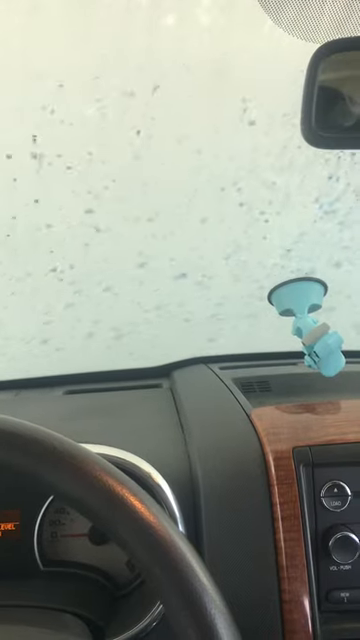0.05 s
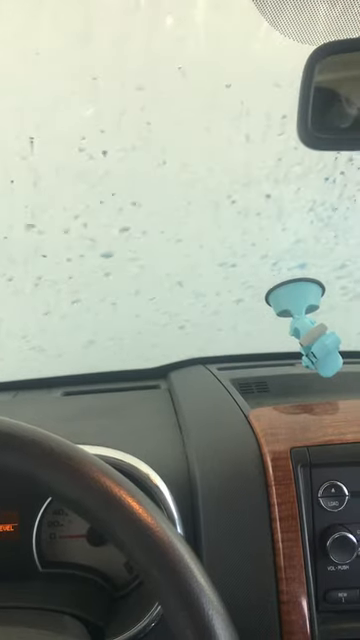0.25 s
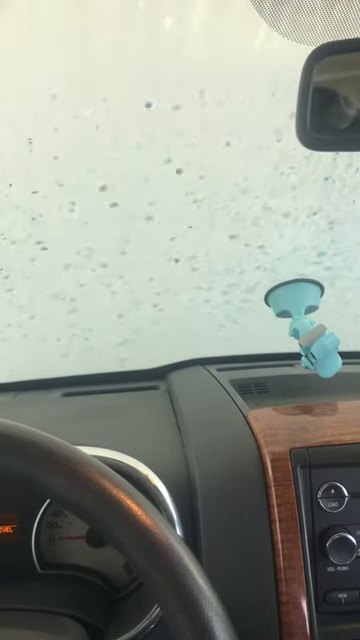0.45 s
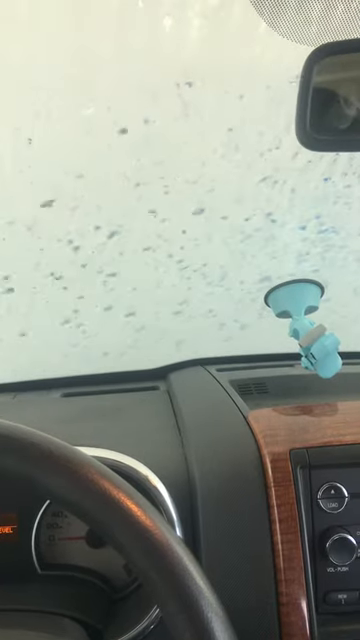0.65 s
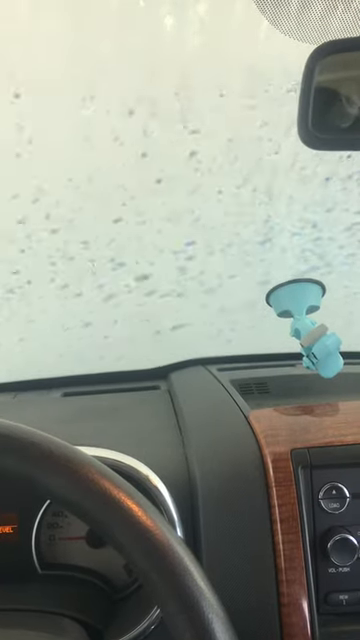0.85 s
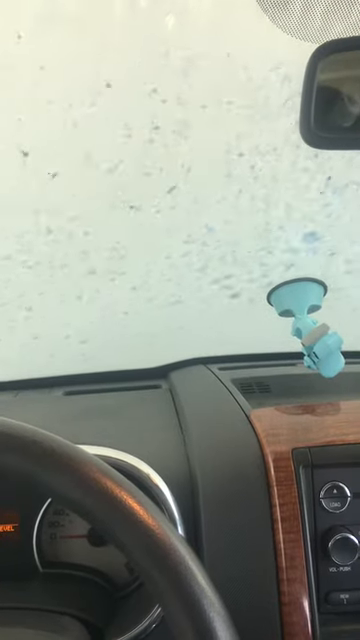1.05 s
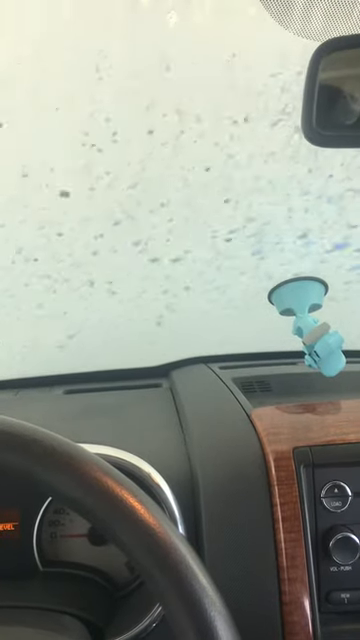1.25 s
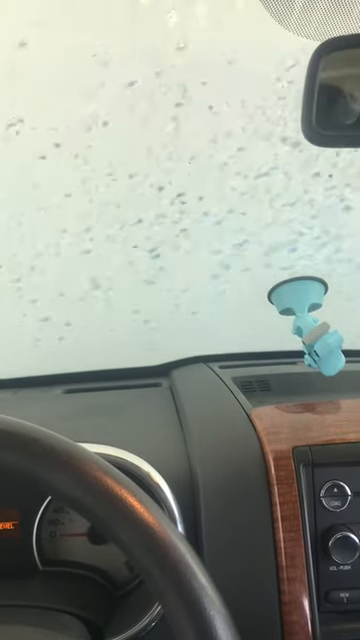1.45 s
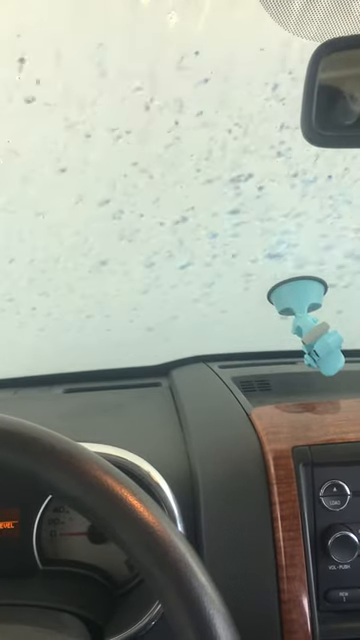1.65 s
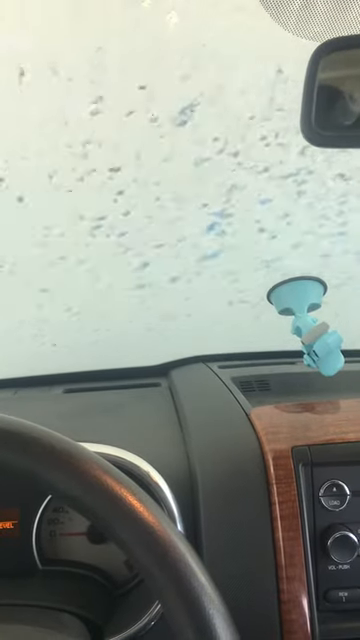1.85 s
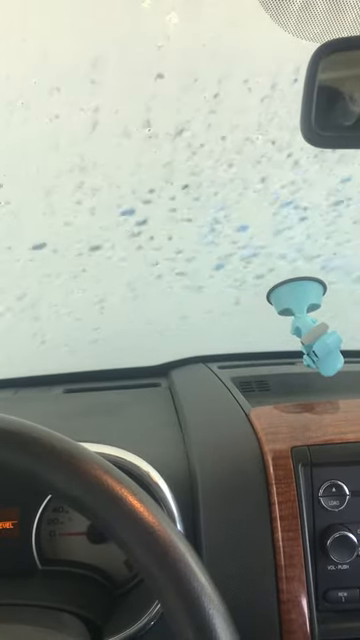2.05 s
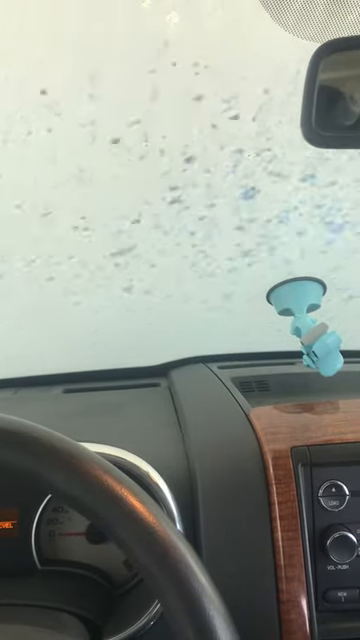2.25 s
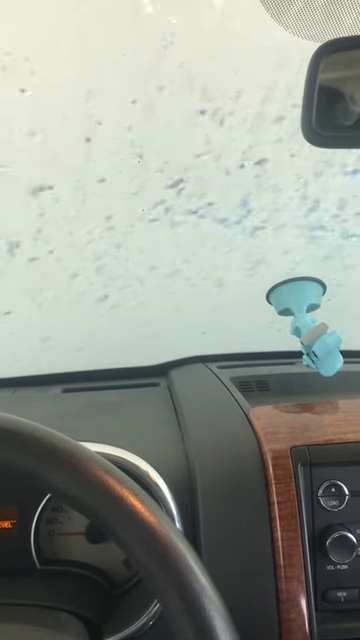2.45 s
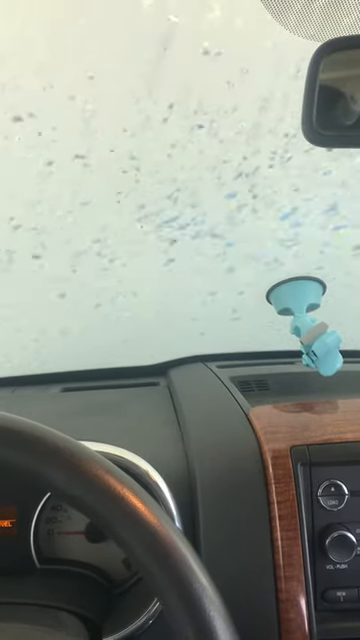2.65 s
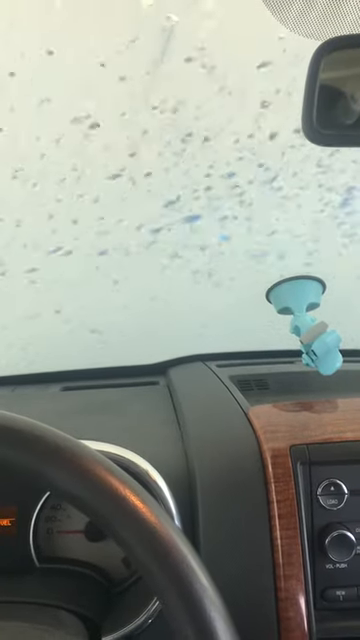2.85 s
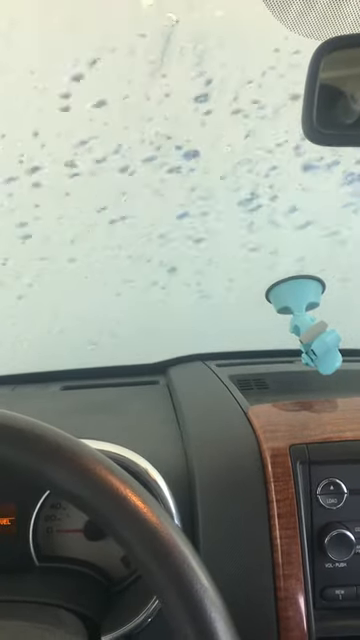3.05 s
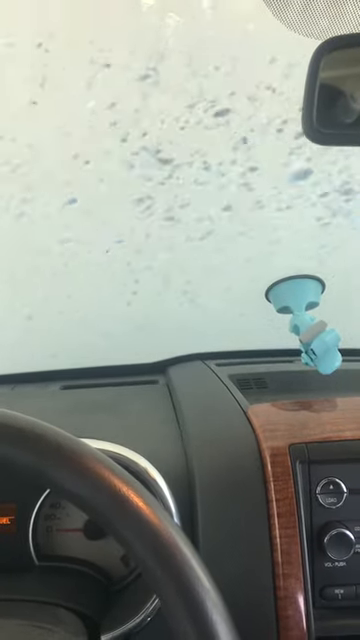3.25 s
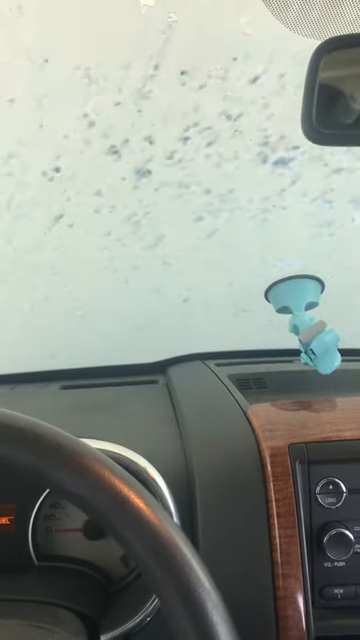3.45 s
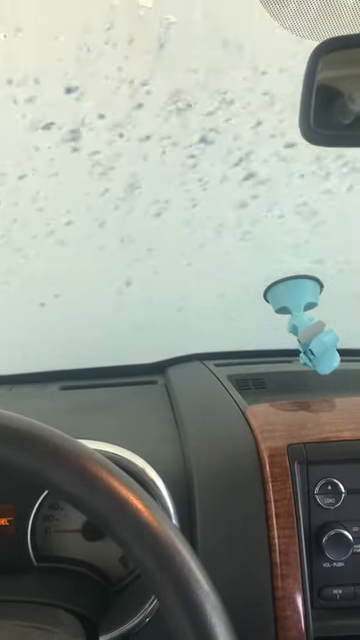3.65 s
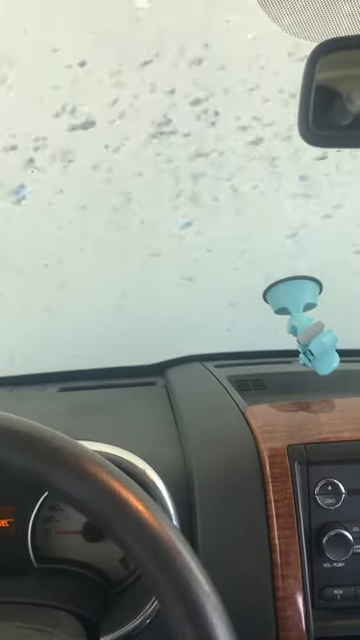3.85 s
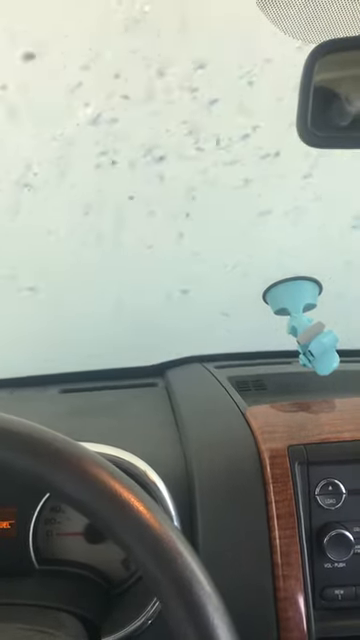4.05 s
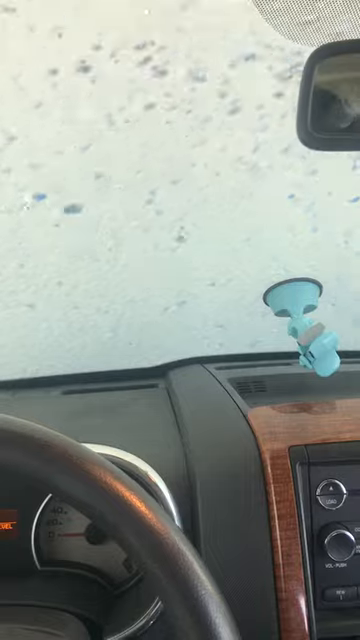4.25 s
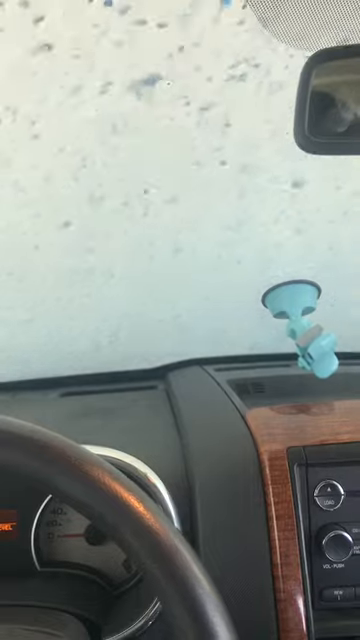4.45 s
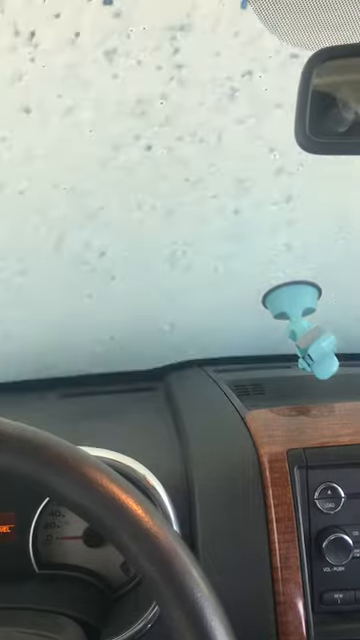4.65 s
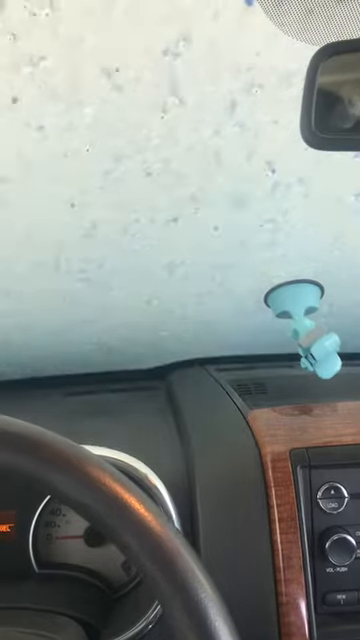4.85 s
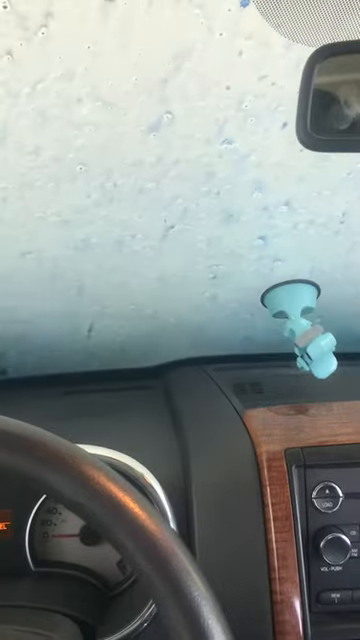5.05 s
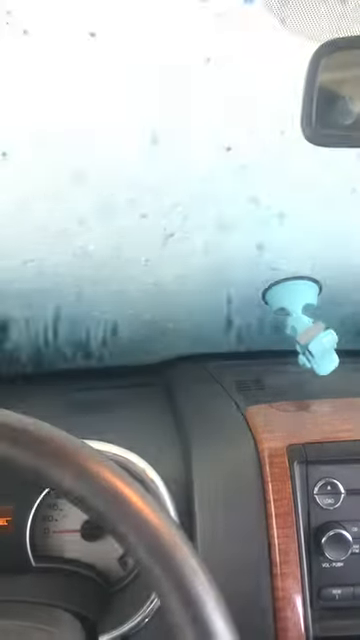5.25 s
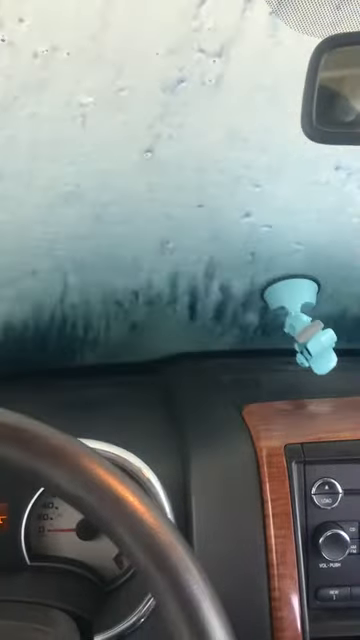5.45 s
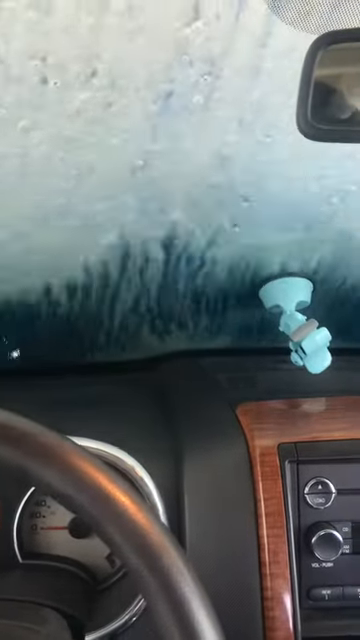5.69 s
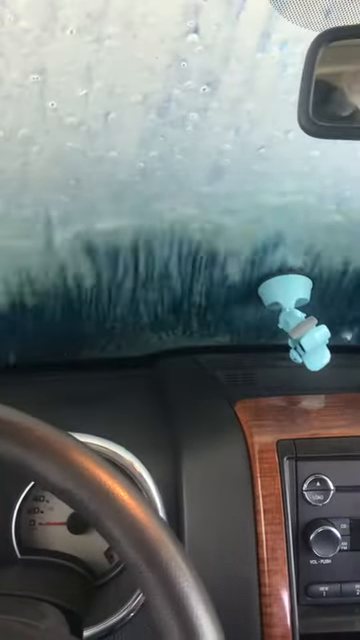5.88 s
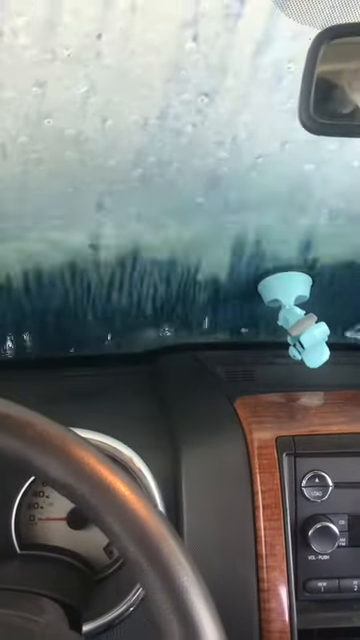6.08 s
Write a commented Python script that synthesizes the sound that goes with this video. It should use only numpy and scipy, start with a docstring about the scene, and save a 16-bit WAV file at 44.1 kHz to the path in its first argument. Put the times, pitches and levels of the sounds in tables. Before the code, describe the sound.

Muffled roller drumming and steady water hiss surround a car's cabin, then wet cloth strips crackle across the glass, growing loud and close.

```python
"""Wet cloth strips on a spinning roller slap the windscreen close in front of a phone at the driver's seat
of a closed car in an automatic wash: short pitched ticks with a wet smear and a spit of treble.
Before that the roller beats along the bonnet: resonant noise drums as booms and panel roar, panels knock,
and each bunch of strips swells as coloured spatter over a steady far wash of water.
As it climbs onto the glass, a bright, grainy scrubbing hiss sets in and swells."""
import sys
import numpy as np
from scipy import signal
from scipy.fft import rfft, irfft
from scipy.io import wavfile
from scipy.ndimage import uniform_filter1d

SR = 44100
rng = np.random.default_rng(int(sys.argv[2]) if len(sys.argv) > 2 else 0)


def voltage_ratio(level):
    """Linear amplitude factor for a level in decibels (scalar or array-like)."""
    return 10 ** (np.asarray(level, float) / 20)


def file_out(sig):
    """Save sig as 16-bit WAV at sys.argv[1]."""
    # one column per channel
    cols = np.atleast_2d(sig).T
    # limit, then scale
    lim = np.clip(cols, -1, 1)
    pcm = np.round(lim * 32767).astype(np.int16)
    wavfile.write(sys.argv[1], SR, pcm)


N = 269892
TIME = np.arange(N) / SR

# Drumming of the body, uneven, louder towards the end.
# Each row: time in seconds, cabin boom level in dB, panel roar level in dB.
DRUM = [(0.0, -30.5, -37.5), (1.3, -29, -38), (2.4, -30.5, -37.5), (3.7, -29.5, -37), (4.05, -27, -37.5),
        (4.2, -32, -36), (4.7, -28, -38), (5.3, -26.5, -32.5), (5.55, -24.5, -30.5), (5.63, -30, -29.5),
        (5.78, -20.5, -31), (5.87, -27, -29.5), (5.94, -20, -28.5), (6.12, -23.5, -29)]
# Air resonances of the closed cabin. Each row: centre in Hz, width in Hz, relative level in dB.
CABIN_MODES = [(30.2, 3.9, -1), (49.2, 11.4, -1.5), (67.3, 9.8, -8), (103.2, 14, -0.5), (130.6, 15.5, -2.5),
               (144.8, 19.6, -1.5), (166.3, 34.4, -8)]
# Resonances of the body panels. Each row: centre in Hz, width in Hz, relative level in dB.
PANEL_MODES = [(203, 35, -4), (246, 70, -1), (318.3, 58.5, 0), (409.5, 100, -4.5), (664, 407, -15.5),
               (836.6, 70, -10), (1008, 99, -11.5), (1205, 112, -14.5)]
# Bunches of wet strips wiping the paint, most of them heavy.
# Each row: time of the crest in seconds, its level in dB before overlap and filtering.
BUNCHES = [(0.055, -51.5), (0.156, -53), (0.31, -57), (0.44, -52.5), (0.549, -49), (0.667, -49.5),
           (0.763, -49), (0.887, -51.5), (0.965, -67), (1.135, -51), (1.22, -61), (1.363, -51),
           (1.476, -52), (1.6, -51.5), (1.72, -62), (1.84, -53), (1.975, -47.5), (2.14, -55), (2.366, -53),
           (2.444, -51), (2.611, -50), (2.73, -51), (2.82, -53), (2.968, -53), (3.097, -54), (3.215, -51),
           (3.316, -55), (3.438, -46.5), (3.536, -49.5), (3.643, -47), (3.835, -50.5), (3.929, -48.5),
           (4.139, -47), (4.196, -49.5), (4.3, -49.5), (4.477, -53), (4.671, -52), (4.759, -47)]
# Spectrum of the swish on the far bonnet. Each row: frequency in Hz, relative density in dB per Hz.
PAINT = [(760, -45.5), (1300, -6), (1540, -7.5), (2720, -7.5), (4920, -14.5), (6180, -18.5), (7770, -23.5),
         (8540, -23), (10300, -22), (12900, -25.5), (15600, -27)]
# Spectrum of the scrubbing on the near windscreen. Each row: frequency in Hz, relative density in dB per Hz.
GLASS = [(760, -32), (1300, 2), (1540, -1), (2430, 3), (3870, -3), (4250, 1.5), (4870, -7.5), (6120, -7.5),
         (7150, -17), (9670, -18), (10400, -19), (11300, -20), (13600, -21), (15600, -24)]
# The roller scrubbing the glass.
# Each row: time in seconds, level in dB of each drop size before its band is filtered out.
SCRUB = [(4.83, -59), (4.864, -48), (4.875, -46), (4.93, -48.5), (5.0, -46.5), (5.09, -50.5), (5.19, -42.5),
         (5.225, -46.5), (5.3, -37), (5.345, -41.5), (5.41, -38), (5.48, -39.5), (5.6, -38), (5.66, -35.5),
         (5.705, -42.5), (5.74, -36.5), (5.84, -35.5), (5.895, -35.5), (5.93, -31.5), (5.97, -35),
         (6.0, -31), (6.043, -34), (6.072, -31.5), (6.12, -33)]
# Strips slapping the glass, hard and soft.
# Each row: start in seconds, tick envelope peak in dB, pitch in Hz, treble in dB before SPIT_DB and filtering.
SLAPS = [(4.8677, -28, 2960, -38), (4.9024, -31, 2550, -52), (4.9432, -30, 3000, -58),
         (4.9608, -31, 3390, -47), (4.9843, -42, 3040, -52), (5.0337, -34, 3670, -55),
         (5.0538, -32, 3520, -45), (5.0736, -36, 2790, -54), (5.1565, -43, 3410, -50),
         (5.1699, -41, 2780, -51), (5.1946, -33, 4150, -52), (5.1997, -32, 3530, -53),
         (5.2102, -29, 2360, -52), (5.2306, -25, 2980, -50), (5.2408, -21.5, 2820, -43),
         (5.2489, -31, 3900, -37), (5.2586, -19.5, 3300, -36), (5.2835, -41, 3580, -49),
         (5.3016, -21.5, 3450, -38), (5.354, -32, 3800, -46), (5.3657, -33, 2950, -40),
         (5.3856, -20, 3110, -34), (5.3978, -17.5, 3500, -42), (5.4014, -18, 3400, -39),
         (5.4241, -24, 2550, -46), (5.4434, -33, 3030, -49), (5.4616, -26, 3770, -44),
         (5.486, -37, 4030, -50), (5.5091, -24, 3300, -49), (5.5406, -28, 2720, -49),
         (5.5505, -24, 4090, -43), (5.5795, -22, 3100, -43), (5.5894, -19, 2700, -49),
         (5.6057, -26, 4000, -48), (5.6369, -27, 3800, -44), (5.6498, -24, 2800, -42),
         (5.6584, -23, 3290, -28), (5.6785, -24, 4020, -39), (5.7265, -17.5, 3670, -47),
         (5.7475, -21.5, 2880, -36), (5.7658, -28, 3410, -42), (5.7773, -24, 4500, -41),
         (5.7969, -32, 3270, -48), (5.8045, -23, 3720, -40), (5.8197, -19, 3200, -38),
         (5.8535, -19, 4380, -38), (5.87, -16, 3800, -32), (5.8714, -20, 3780, -39),
         (5.9097, -25, 3750, -42), (5.9154, -19, 3280, -38), (5.9276, -21, 3050, -36),
         (5.934, -16, 3930, -34), (5.9775, -14.5, 2870, -37), (5.9795, -27, 2950, -41),
         (5.9828, -28, 2430, -44), (5.9887, -20, 2550, -37), (5.9917, -24, 2870, -41),
         (6.007, -13.5, 3750, -32), (6.014, -22, 3810, -32), (6.0262, -17, 3070, -43),
         (6.0486, -26, 3800, -28), (6.0565, -20, 3300, -29), (6.0939, -30, 3100, -26),
         (6.1018, -31, 3060, -30), (6.1113, -29, 3100, -27)]
# Knocks on a panel.
# Each row: start in seconds, drive in dB before the knock's gains, row of PANEL_MODES that rings (from 0).
KNOCKS = [(2.598, -33, 6), (2.855, -31, 6), (3.1, -35, 6), (3.424, -36, 4), (3.43, -31.5, 6),
          (3.4355, -33.5, 7), (3.444, -38, 5), (3.634, -34, 5), (4.221, -30, 7)]
# Dips from reflections near the phone. Each row: centre in Hz, width in Hz, depth from 0 to 1.
DIPS = [(4920, 200, 0.45), (7500, 660, 0.17), (10380, 1630, 0.52)]

GLASS_START_S = SCRUB[0][0]  # the roller leaves the bonnet for the windscreen
WASH_DB = -49.5  # level in dB of the steady far wash
BUNCH_SPREAD_S = 0.019  # standard deviation of each swell
LIGHT_WIPES_PER_S, LIGHT_WIPE_DB, LIGHT_WIPE_SCATTER_DB = 8, -62, 2
KNOCK_RING_DB, KNOCK_SCUFF_DB = 2.5, 0
BOOM_DRIFT, PANEL_DRIFT = 0.04, 0.012  # rms share by which the loaded body's resonances wander
FLICKS_PER_S, FLICK_DB, FLICK_TREBLE_DB, FLICK_SCATTER_DB = 400, 2, -14, 2.5  # dB over the scrub level
FLICK_HZ, FLICK_OCTAVES = 3100, 0.32  # median pitch of the random strips and its spread
TICK_CYCLES = 1.1
SPLASH_DB, SPLASH_S = -12.5, 0.0025  # wet smear, over the strip's tick
SPIT_DB, SPIT_S, SPIT_RISE_S = 4, 0.0012, 0.0002  # burst of treble, over the strip's treble setting
SPIT_TAIL, SPIT_TAIL_S = 0.1, 0.012  # share and decay time of the after-sizzle


def curve(table):
    """Each column of a table as a signal, joined by straight lines."""
    s, *columns = np.transpose(table)
    return [np.interp(TIME, s, column) for column in columns]


def unit(x):
    """Scale to rms 1."""
    return x / np.sqrt(np.mean(x ** 2))


def above(x, hz):
    """Steep high-pass."""
    return signal.sosfilt(signal.butter(4, hz, "high", fs=SR, output="sos"), x)


def below(x, hz):
    """Steep low-pass."""
    return signal.sosfilt(signal.butter(4, hz, fs=SR, output="sos"), x)


def ring(x, hz, width):
    """Two-pole resonance, gain 1 at the centre."""
    return signal.lfilter(*signal.iirpeak(hz, hz / width, fs=SR), x)


def colour(x, table):
    """Causal, unit-energy filter with the shape of a spectrum, built from the folded cepstrum."""
    hz, db = np.transpose(table)
    log_hz = np.log(np.fft.rfftfreq(1024, 1 / SR) + 1)
    gain_db = np.interp(log_hz, np.log(hz), db)
    cepstrum = irfft(gain_db * np.log(10) / 20)
    cepstrum[1:512] *= 2
    cepstrum[513:] = 0
    taps = irfft(np.exp(rfft(cepstrum)))
    return signal.fftconvolve(x, taps / np.sqrt(np.sum(taps ** 2)))[:N]


def walk(rate):
    """Random levels held 1 / rate seconds, smoothed twice and scaled to rms 1."""
    hold = int(SR / rate)
    steps = np.repeat(rng.standard_normal(N // hold + 1), hold)
    smooth = uniform_filter1d(uniform_filter1d(steps, hold), hold)
    return unit(smooth[:N])


def fade(x, t60):
    """Every impulse leaves an exponential tail."""
    return signal.lfilter([1], [1, -np.exp(-np.log(1000) / (t60 * SR))], x)


def spatter(per_s, spread_db, t60):
    """Dense droplets and strip ends: random clicks of unequal size, each with a short noisy tail."""
    hit = rng.random(N) < per_s / SR
    size = hit * voltage_ratio(spread_db * np.minimum(rng.exponential(size=N), 3))
    # overlapping tails add in power
    power = fade(size ** 2, t60 / 2)
    return unit(np.sqrt(power) * rng.standard_normal(N))


def resonate(modes, flicker_db, drift):
    """Unrelated noise in each resonance, whose level flickers and whose centre wanders a little."""
    out = 0
    for hz, width, db in modes:
        # a second, wider pass darkens the valleys
        tone = ring(ring(rng.standard_normal(N + SR), hz, width), hz, 2.36 * width)
        # reading the noise at an uneven pace bends its pitch
        place = SR / 2 + np.cumsum(1 + drift * walk(2.5))
        bent = np.interp(place, np.arange(N + SR), tone)
        out = out + voltage_ratio(db + flicker_db * walk(6)) * bent
    return unit(out)


def cabin(x, wet_db, t60):
    """Sparse early reflections from glass, roof and seats of the small, padded cabin."""
    t = TIME[:2000]
    echoes = (rng.random(len(t)) < 0.04) * rng.standard_normal(len(t))
    echoes = echoes * np.exp(-np.log(1000) * t / t60)
    return x + voltage_ratio(wet_db) * signal.fftconvolve(x, echoes / np.sqrt(np.sum(echoes ** 2)))[:N]


def wash():
    """Steady water on the far bonnet: droplets whose tails merge into a hiss."""
    return voltage_ratio(WASH_DB) * colour(spatter(900, 1.34, 0.11), PAINT)


def bunches():
    """Amplitude of the wiping: one smooth swell shape for each bunch landing until the roller is on the glass."""
    # light wipes fall at random
    lands = (rng.random(N) < LIGHT_WIPES_PER_S / SR) * (TIME < GLASS_START_S)
    lands = lands * voltage_ratio(LIGHT_WIPE_DB + LIGHT_WIPE_SCATTER_DB * rng.standard_normal(N))
    s, db = np.transpose(BUNCHES)
    lands[(s * SR).astype(int)] = voltage_ratio(db)
    swell = signal.windows.gaussian(SR // 4, BUNCH_SPREAD_S * SR)
    return np.maximum(signal.fftconvolve(lands, swell, "same"), 0)


def wipes(wiping):
    """Each bunch of strips swishes over the paint: spatter that swells and dies away."""
    swish = wiping * colour(spatter(700, 1.5, 0.044), PAINT)
    # a little duller than the wash
    return below(swish, 8900) + voltage_ratio(-3.0) * above(swish, 12000)


def knocks():
    """A bunch of strips scuffs a panel, which rings briefly at its own resonance."""
    out = np.zeros(N)
    t = TIME[:4000]
    push = np.exp(-t / 0.0063) * (1 - np.exp(-t / 0.0021))
    for s, db, panel in KNOCKS:
        tone = np.sin(2 * np.pi * PANEL_MODES[int(panel)][0] * t)
        scuff = ring(ring(rng.standard_normal(len(t)), 1100, 2000), 1100, 2000)
        i = int(s * SR)
        out[i:i + len(t)] += voltage_ratio(db) * push * (voltage_ratio(KNOCK_RING_DB) * tone + voltage_ratio(KNOCK_SCUFF_DB) * scuff)
    return out


def drumming(wiping):
    """The roller shakes the body: low booms of the cabin air and a roar of the panels."""
    boom_db, roar_db = curve(DRUM)
    boom = voltage_ratio(boom_db) * resonate(CABIN_MODES, 0.058, BOOM_DRIFT)
    roar = voltage_ratio(roar_db) * resonate(PANEL_MODES, 0.51, PANEL_DRIFT)
    # every bunch also shakes the lighter panels a little harder
    light_panels = [mode for mode in PANEL_MODES if mode[0] > 500]
    shake = voltage_ratio(1.0) * wiping * resonate(light_panels, 0.27, PANEL_DRIFT)
    return boom + roar + shake


def scrub():
    """On the glass the roller is bright and grainy; drops of each size patter apart from the others."""
    level_db, = curve(SCRUB)
    touch = np.clip((TIME - GLASS_START_S) / 0.034, 0, 1)
    big = colour(spatter(690, 2.6, 0.02), GLASS)
    medium = colour(spatter(1380, 7.2, 0.0075), GLASS)
    fine = colour(spatter(605, 2.0, 0.019), GLASS)
    drops = below(big, 4300) + above(below(medium, 10800), 4140) + above(fine, 6400)
    return touch * voltage_ratio(level_db) * drops


def flicks():
    """Further strips landing at random on the glass, following the scrub level, as rows like SLAPS."""
    span = N / SR - GLASS_START_S
    count = int(FLICKS_PER_S * span)
    s = GLASS_START_S + span * rng.random(count)
    size, pitch, bright = rng.standard_normal((3, count))
    level_db = np.interp(s, *np.transpose(SCRUB))
    peak_db = level_db + FLICK_DB + FLICK_SCATTER_DB * size
    hz = FLICK_HZ * 2 ** (FLICK_OCTAVES * pitch)
    treble_db = level_db + FLICK_TREBLE_DB + FLICK_SCATTER_DB * bright
    return np.transpose([s, peak_db, hz, treble_db])


def slaps():
    """Each strip ticks for a few cycles at its own pitch, smears wetly and spits treble."""
    t = TIME[:1500]
    body, spit = np.zeros((2, N + len(t)))
    splash_fade = np.exp(-t / SPLASH_S) + 0.27 * np.exp(-t / 0.017)
    spit_fade = np.exp(-t / SPIT_S) + SPIT_TAIL * np.exp(-t / SPIT_TAIL_S)
    spit_shape = spit_fade * (1 - np.exp(-t / SPIT_RISE_S))
    for s, db, hz, treble_db in [*SLAPS, *flicks()]:
        noise = rng.standard_normal((2, len(t)))
        cycles = hz * t / TICK_CYCLES
        # the envelope rises to 1 and dies away
        tick = np.e * 2 * cycles * np.exp(-2 * cycles) * np.sin(2 * np.pi * hz * t)
        smear = voltage_ratio(SPLASH_DB) * splash_fade * unit(ring(noise[0], hz, 0.36 * hz))
        i = int(s * SR)
        body[i:i + len(t)] += voltage_ratio(db) * (tick + smear)
        spit[i:i + len(t)] += voltage_ratio(treble_db + SPIT_DB) * spit_shape * noise[1]
    return body[:N] + above(spit[:N], 5000) - 0.16 * above(spit[:N], 9800)


def scene():
    """All sources as they reach the driver's seat; swish, scrub and slaps also reflect in the cabin."""
    wiping = bunches()
    water_and_strips = wash() + wipes(wiping) + scrub() + slaps()
    heard = knocks() + drumming(wiping) + cabin(water_and_strips, wet_db=-19, t60=0.05)
    return heard[None]


def low_pass(x):
    """Removes everything above the highest recorded frequency."""
    return signal.sosfilt(signal.butter(12, 15820, fs=SR, output="sos"), x)


def record(dry):
    """Reflections near the phone cut narrow dips; its microphone drops the deepest bass."""
    x = dry
    for hz, width, depth in DIPS:
        x = x - depth * ring(x, hz, width)
    mix = above(above(x, 32), 32)
    return low_pass(mix)


dry = scene()
out = record(dry)
file_out(out)
```